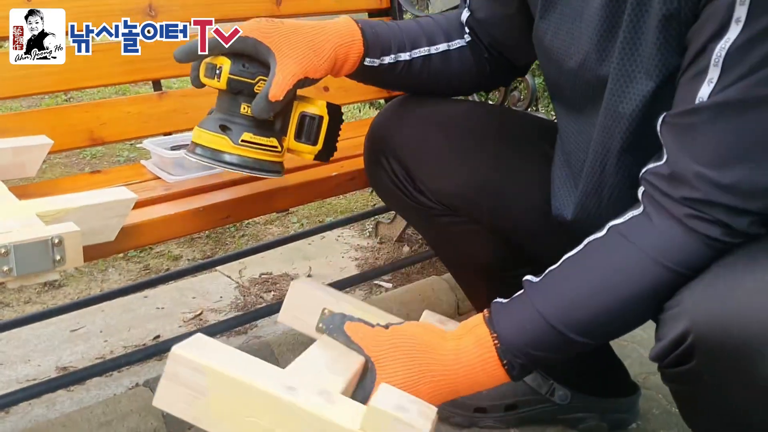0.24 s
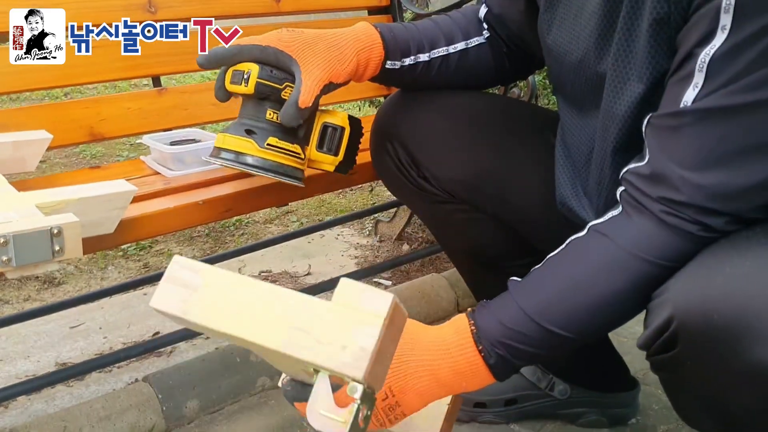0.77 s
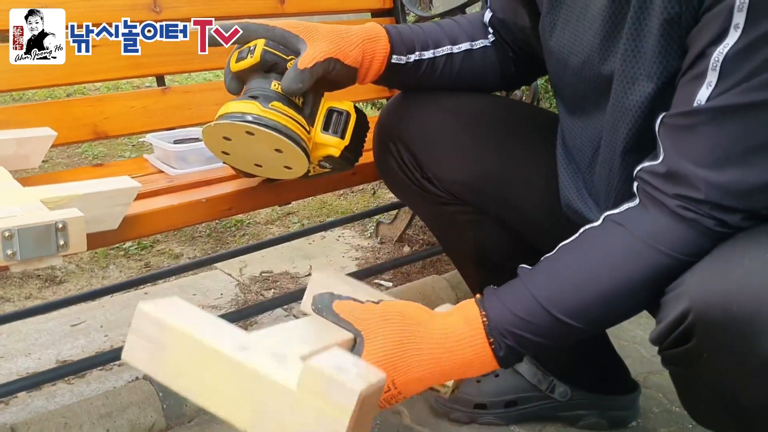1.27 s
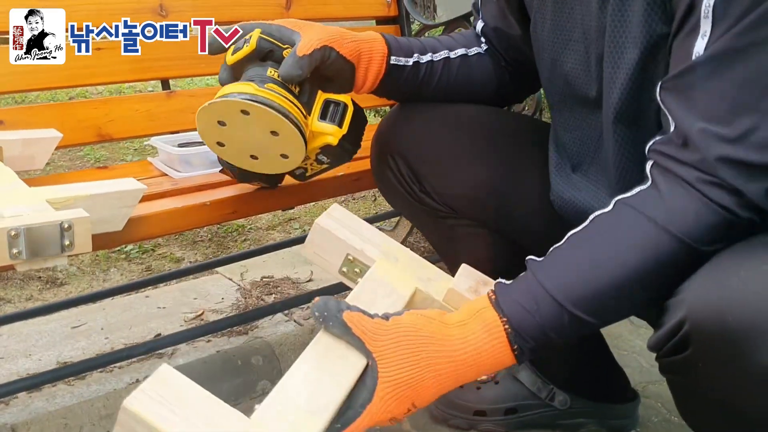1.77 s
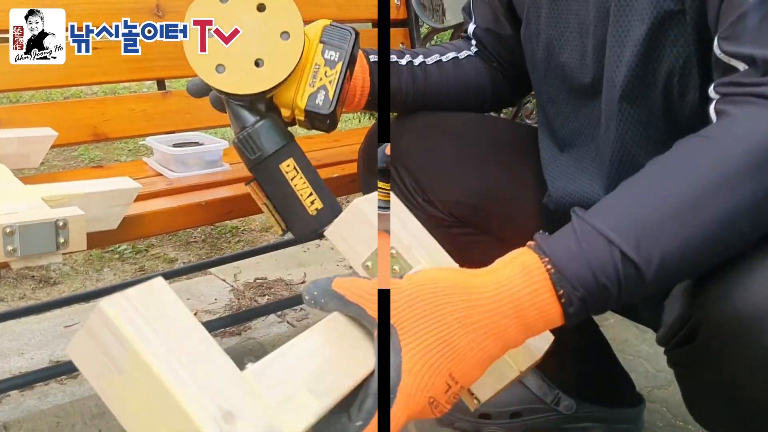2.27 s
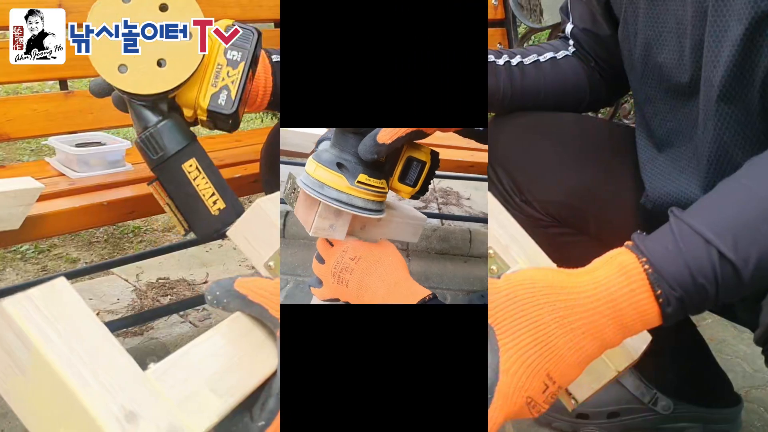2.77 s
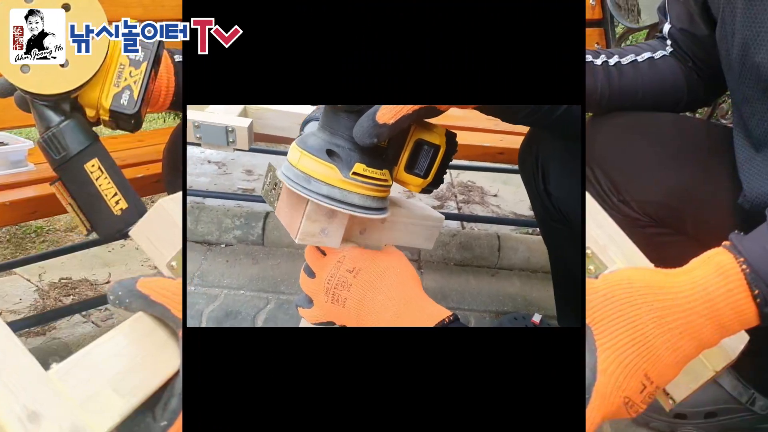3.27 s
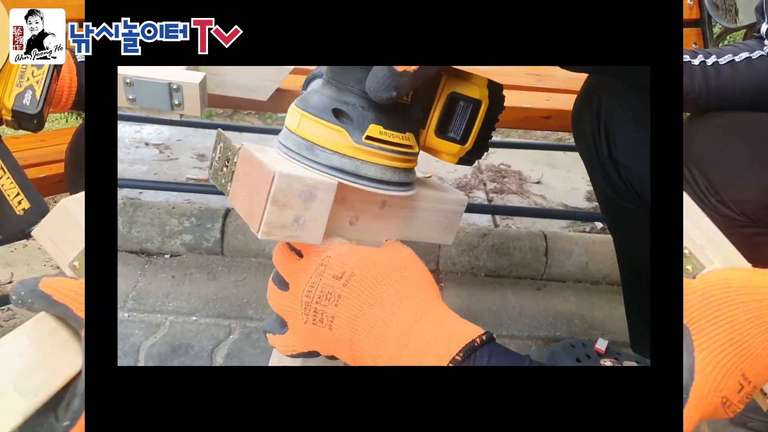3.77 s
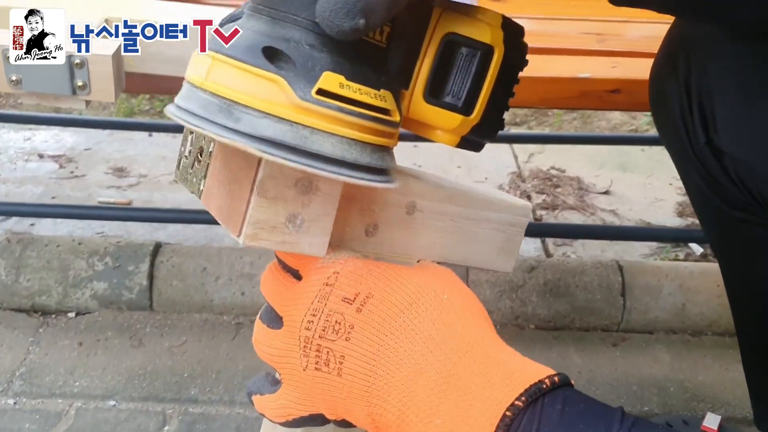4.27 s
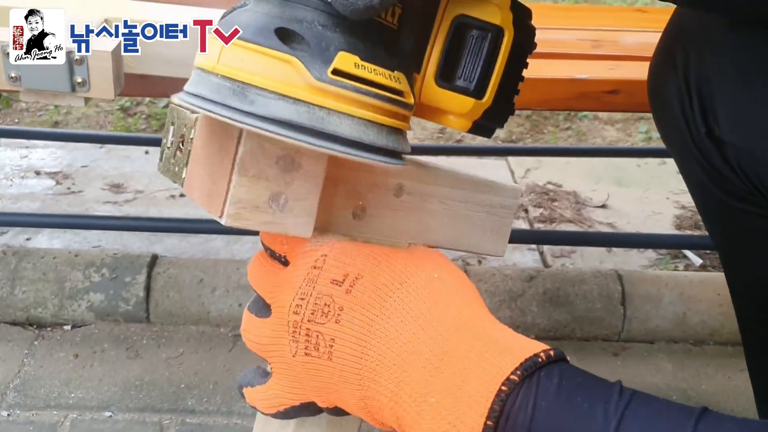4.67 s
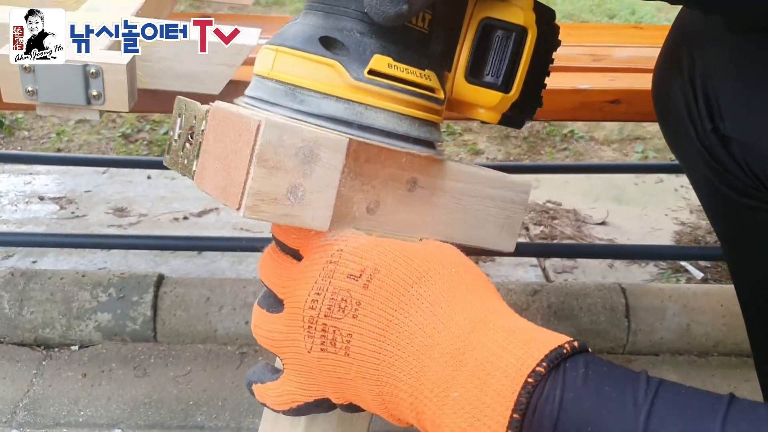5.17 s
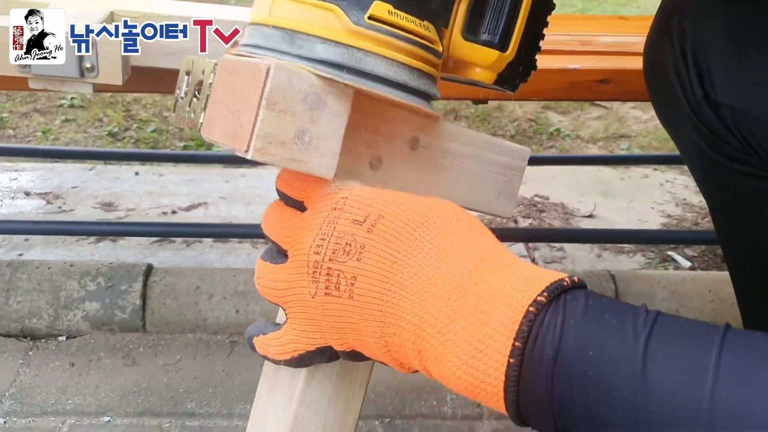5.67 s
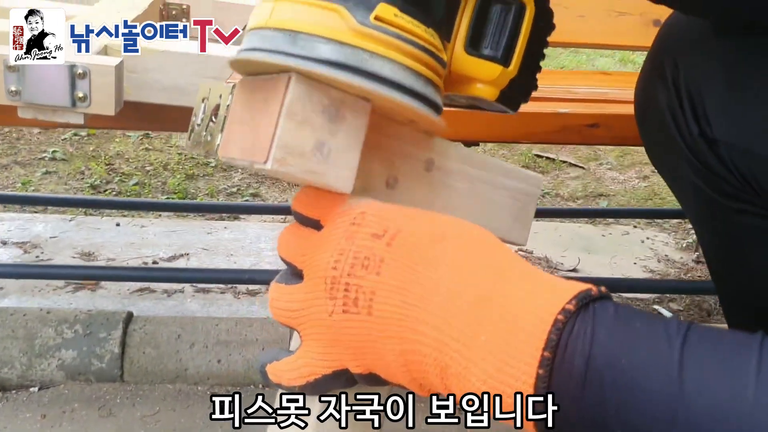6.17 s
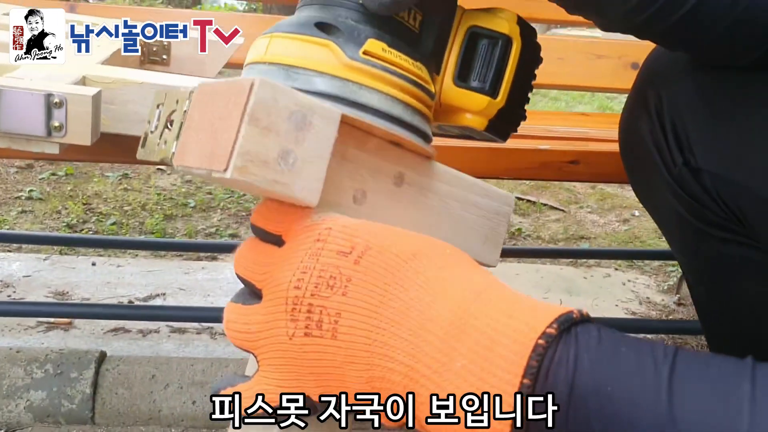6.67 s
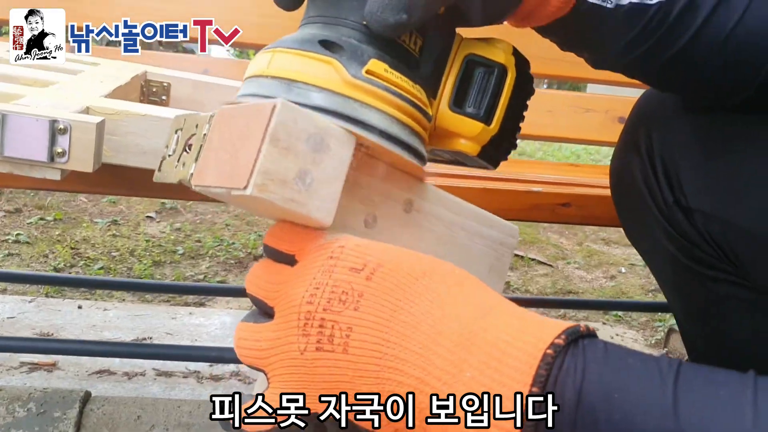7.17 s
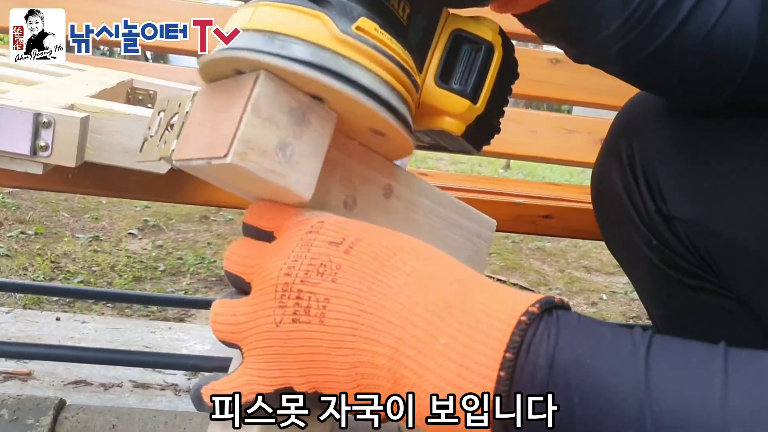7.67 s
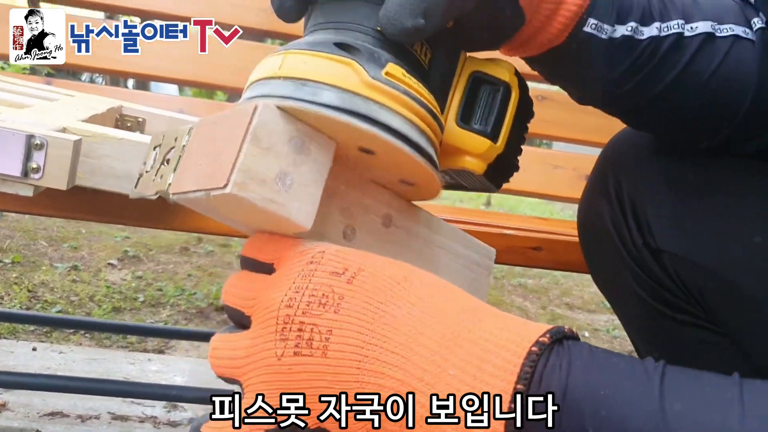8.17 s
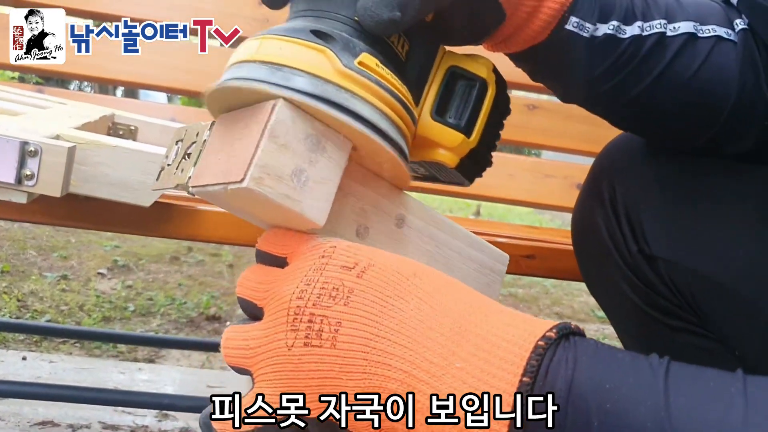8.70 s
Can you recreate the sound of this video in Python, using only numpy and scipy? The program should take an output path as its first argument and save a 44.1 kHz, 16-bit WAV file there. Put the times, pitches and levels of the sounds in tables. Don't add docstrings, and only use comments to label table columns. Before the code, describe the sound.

Quiet outdoor yard with traffic rumble, faint insect chirps and wood knocks, a brief dropout, then a loud orbital sander buzzing and rasping on wood.

```python
import sys
import numpy as np
from scipy import signal
from scipy.io import wavfile
from scipy.ndimage import uniform_filter1d

SR = 44100
rng = np.random.default_rng(int(sys.argv[2]) if len(sys.argv) > 2 else 0)


def volts_from_db(level):
    exponent = np.asarray(level, float) / 20
    return 10 ** exponent


def persist_wave(psi):
    counts = np.round(np.clip(psi, -1, 1) * 32767).astype(np.int16)
    wavfile.write(sys.argv[1], SR, np.atleast_2d(counts).T)


N = 394254
CUT_S, TICK_S, BACK_S = 2.1535, 2.27295, 2.353
LEAK_DB = -58
USUAL_FORCE, USUAL_SPEED = 0.6, 144

# time in seconds, level in dB.
CREEP = [(0, -68.5), (.4, -67), (.9, -62), (1.4, -58), (1.6, -57.2), (2.154, -57.2)]
# frequency in Hz, density in dB per Hz.
GRIT = [(2000, -12.5), (2700, -13), (3050, -11), (3500, -3), (4300, -2), (5000, -2), (5600, -6.5),
        (6000, -2.5), (7000, -1), (7700, -4.5), (9700, -9.5), (10500, -8.5), (12000, -14.5), (15700, -44)]


def evened(x):
    return x / np.sqrt(np.mean(abs(x) ** 2) + 1e-20)


def curves(rows):
    s, *columns = np.transpose(rows)
    return [np.interp(np.arange(N) / SR, s, c) for c in columns]


def bumps(s, length, size):
    t = np.arange(0, N + 50, 50) / SR
    total = np.exp(-2 * ((t[:, None] - s) / length) ** 2) @ size
    return np.interp(np.arange(N) / SR, t, total)


def band(x, lo_hz, hi_hz):
    sos = signal.butter(4, [lo_hz, hi_hz], "band", fs=SR, output="sos")
    return np.sqrt(np.mean(signal.sosfilt(sos, x) ** 2))


def noise(colour, patchy_db, bins, frames):
    hz = np.fft.rfftfreq(1024, 1 / SR)
    f, level_db = np.transpose(colour)
    a, b, patches = rng.standard_normal((N // 256 + 5, 513, 3)).T
    patches = uniform_filter1d(patches, size=bins, axis=0)
    patches = evened(uniform_filter1d(patches, size=frames, axis=1))
    shape_db = np.interp(np.log(hz + 1), np.log(f + 1), level_db, left=-90)[:, None]
    spectra = (a + 1j * b) * volts_from_db(shape_db + patchy_db * patches)
    return signal.istft(spectra, nperseg=1024, noverlap=768)[1][:N]


def wander(hz, count):
    shape = (N // 100 + 400, count)
    z = rng.standard_normal(shape) + 1j * rng.standard_normal(shape)
    sos = signal.butter(1, hz, fs=SR / 100, output="sos")
    z = evened(signal.sosfiltfilt(sos, z, axis=0)[200:-198])
    return [np.interp(np.arange(N) / 100, np.arange(len(z)), row) for row in z.T]


def shaft_orders(step, hz, force, damping_db, flutter_db, shakes):
    # multiple, level in dB, dB more per unit of force, dB more per orbit per s.
    order_levels = [(1, -8.5, -0.8, 0), (2, -6, -3.5, 0), (3, -3, 0, 0), (4, -6, 2.5, 0.3),
                    (5, -9, -4.5, -0.2), (6, -12.5, 10, 0.7), (7, -11, 3.9, .4), (8, -4.5, 5.5, 0.84),
                    (9, -1.5, -4, -0.5), (10, -10.5, 3.5, 0), (11, -9.5, 1, 0.1), (12, -7, -0.5, 1.1),
                    (13, -11.5, -0.5, -1.4), (14, -9.5, -2.3, 0), (15, -16, 2, -0.6), (16, -15, -3.5, -0.5),
                    (17, -20, 4, -2), (18, -18.5, 1, 1), (19, -18.5, -1, 1.5), (20, -15, 1, 0),
                    (21, -24.5, 0, 1), (22, -17.5, 3.5, 0.5)]
    chance_shares = {1: .1, 2: .38, 3: .27, 4: .48, 5: .8, 6: .75, 7: .75, 8: .45, 9: .36, 11: .58, 12: .55,
                     14: .62}
    # centre in seconds, length in seconds, level in dB.
    chokes = [
        (4.45, 0.15, -11),
        (5.58, 0.078, -5),
        (7.45, .06, -2),
        (8.78, 0.065, -3),
    ]
    choked_db = bumps(*np.transpose(chokes))
    fade_db = -0.7 * (np.arange(N) / SR - BACK_S)
    own_db = {2: damping_db, 4: choked_db, 9: choked_db + fade_db}
    tone, turn = np.zeros(N), 1
    phases = rng.random(len(order_levels))
    for (k, db, force_db, speed_db), shake, phase in zip(order_levels, shakes, phases):
        k, turn = round(k), turn * step
        share = chance_shares.get(k, np.clip(0.58 + 0.015 * (k - 4), 0, 1))
        if k % 2 == 0 and k >= 10:
            phase = 0
        if k == 3:
            level = 0.013 + 0.063 * force
        else:
            push_db = force_db * (force - USUAL_FORCE) + speed_db * (hz - USUAL_SPEED)
            level = volts_from_db(db - 24 + push_db + own_db.get(k, 0))
        if k == 1:
            level = level * volts_from_db(0.6 * flutter_db)
        waver = np.sqrt(1 - share ** 2) + share * shake
        tone += np.sqrt(2) * level * (waver * turn * np.exp(2j * np.pi * phase)).real
    return tone


def grain_repeats(step, hz):
    f, colour_db = np.transpose(GRIT)
    tone = np.zeros(N)
    turn = step ** 22 * volts_from_db(0.6 * (hz - USUAL_SPEED))
    for k, shake in enumerate(wander(10.0, count=26), 23):
        turn = turn * step
        level_db = -37.5 - 0.33 * (k - 22) + np.interp(k * hz.mean(), f, colour_db)
        tone += volts_from_db(level_db) * (abs(shake) * shake * turn).real
    return tone


def abrasion_and_fan(step, force, flutter_db, shake, drift):
    # frequency in Hz, density in dB per Hz.
    fan_colour = [(25, -30), (45, -49), (65, -28), (120, -8.5), (200, -14.5), (500, -2.5), (900, -6.5),
                  (1300, -1), (2000, 2), (2600, -3), (3200, -15.5)]
    grit = noise(GRIT, 1.57, bins=14, frames=12)
    fan = noise(fan_colour, 2.3, bins=6, frames=12)
    grit_db = -21 - 0.4 * (force - USUAL_FORCE) + flutter_db
    bite = 1 + ((0.099 + 0.15 * shake) * step + (0.058 + 0.11 * drift) * step ** 2).real
    rasp = volts_from_db(grit_db - 2.5) * grit / band(grit, 1800, 17000)
    return bite * (rasp + volts_from_db(-25) * evened(fan))


def sander():
    # centre in seconds, length in seconds, force, sag in orbits per s, second-order damping in dB.
    strokes = [(2.553, 0.21, 0.92, 0.45, -4.2), (2.92, 0.151, 0.93, 1.8, -5.4),
               (3.194, 0.104, 0.92, 1.93, -1.8), (3.471, 0.145, 0.94, 3.08, -4.9),
               (3.773, 0.15, 1.09, 2.76, -5.3), (4.245, 0.3, 1.2, 4.27, -3.0),
               (4.453, 0.148, 0.51, 2.73, -5.2), (4.825, 0.225, 1.13, 3.03, -8.2),
               (5.097, 0.154, 0.8, 2.03, -11.2), (5.424, 0.149, 0.5, 0.19, -2.1),
               (5.639, 0.155, 0.91, 1.35, -1.3), (5.924, 0.153, 0.97, 2.3, -3.5),
               (6.258, 0.167, 1.07, 2.64, -6.1), (6.558, 0.139, 1.05, 3.65, -2.7),
               (6.782, 0.091, 0.4, 0.41, -1.9), (7.074, 0.252, 0.94, 2.14, -2.4),
               (7.503, 0.155, 0.9, 2.33, -4.5), (7.863, 0.241, 0.67, 1.76, -6.6),
               (8.255, 0.212, 0.98, 0.99, -9.7), (8.461, 0.136, 0.86, 2.28, -6.1),
               (8.756, 0.23, 0.63, 2.4, -5.2)]
    # time in seconds, orbits per s.
    free_speed = [(2.35, 144.5), (3.9, 145.9), (4.35, 145.3), (4.7, 145.1), (5.1, 145.2), (5.4, 147.9),
                  (6.2, 145.8), (7.0, 146.9), (7.8, 144.8), (8.2, 144.1), (8.6, 142.5), (8.94, 142.0)]
    # centre in seconds, length in seconds, abrasion in dB.
    grabs = [(3.125, 0.083, -1.5), (3.38, 0.2, 0.7), (3.9, 0.064, 1.5), (4.035, 0.054, -1.5),
             (4.55, 0.15, 1), (4.84, .13, -2), (5.22, .06, -2.5), (5.682, 0.081, -3), (5.83, 0.076, 1.5),
             (6.66, .09, -1.5), (6.81, .07, 1.2), (7.142, .09, -3), (7.7, 0.16, 1.5), (8.808, 0.25, 2.3)]
    s, length, push, sag, damping = np.transpose(strokes)
    late_s = s + 0.05
    force = bumps(s, length, push)
    hz = curves(free_speed)[0] - bumps(late_s, length, sag)
    damping_db = bumps(late_s, length, damping)
    flutter_db = 1.3 * wander(10, count=1)[0].real + bumps(*np.transpose(grabs))
    drift, *shakes = wander(12, count=23)
    step = np.exp(2j * np.pi * np.cumsum(hz) / SR)
    tone = shaft_orders(step, hz, force, damping_db, flutter_db, shakes) + grain_repeats(step, hz)
    return tone + abrasion_and_fan(step, force, flutter_db, shakes[0], drift)


def knocks():
    # start in seconds, peak in dB, crack centre in Hz, low ring in Hz, low ring in dB.
    knock_list = [(.11, -49, 4200, 477, -8), (.183, -39, 5000, 360, -6), (.245, -42, 4300, 350, -8),
                  (.852, -40, 4800, 344, -6), (.945, -40, 5570, 1800, 6), (0.951, -42, 6940, 1420, 15.5),
                  (1.4626, -35, 4430, 345, -12), (1.4794, -33, 5260, 560, -10),
                  (1.505, -23.5, 7000, 330, -16), (1.616, -31, 7000, 302, -14),
                  (1.6822, -27.5, 4900, 1390, 0), (1.94, -27, 5300, 360, -7),
                  (2.0358, -36.5, 3000, 476, 19.5), (2.053, -22, 3000, 935, -2),
                  (2.0555, -24, 4500, 600, 3), (2.066, -25, 4500, 387, -2.5),
                  (2.0878, -18.5, 4600, 500, -21), (2.112, -25, 3000, 1320, 3), (2.116, -29, 2180, 905, -2)]
    out, t = np.zeros(N), np.arange(3000) / SR
    fade_db = -60 * t / 0.022
    cracks = rng.standard_normal((len(knock_list), len(t)))
    for (s, peak_db, hz, low_hz, low_db), crack in zip(knock_list, cracks):
        wide = signal.filtfilt(*signal.iirpeak(hz, 1.1, SR), crack)
        narrow = signal.lfilter(*signal.iirpeak(hz, 7, SR), crack)
        rough = signal.lfilter(*signal.iirpeak(2 * low_hz, 1, SR), crack)
        thud = 1.5 * np.sin(2 * np.pi * low_hz * t) + 0.28 * evened(rough)
        high = (0.55 * evened(wide) + 0.3 * evened(narrow)) * volts_from_db(fade_db)
        out[round(s * SR):][:len(t)] += volts_from_db(peak_db + fade_db) * (high + volts_from_db(low_db) * thud)
    return out


def insect():
    # start in seconds, length in seconds, level in dB.
    calls = [
        (1.05, .23, -55.5),
        (1.26, 0.12, -55),
        (1.38, .08, -57),
        (1.68, 0.092, -53),
        (1.8, .07, -53),
    ]
    t = np.arange(N) / SR
    hz = 5110 - 18 * (t - calls[0][0])
    level = np.zeros(N)
    for s, length, db in calls:
        level += volts_from_db(db) * np.clip(np.minimum(t - s, s + length - t) / 0.025, 0, 1)
    flutter = 1 + 0.4 * wander(40, count=1)[0]
    return level * np.sqrt(2) * (flutter * np.exp(2j * np.pi * np.cumsum(hz) / SR)).real


def traffic():
    # frequency in Hz, density in dB per Hz.
    rumble_colour = [(20, -33), (45, -23), (65, -4), (85, -8.5), (125, 9.5), (190, 0), (260, -9.5),
                     (350, -6.5), (500, -7.5), (900, -41.5)]
    wash_colour = [(180, -24), (300, 3.5), (420, -16), (530, -2), (700, -6.5), (1400, -7), (1800, -8.5),
                   (2100, -13), (3000, -16), (5300, -24.5), (8000, -31.5), (12000, -51)]
    # frequency in Hz, density in dB per Hz.
    hiss_colour = [(3000, -8), (5500, 0), (9000, -8.5), (15700, -19)]
    # centre in seconds, length in seconds, rise in dB.
    swells = [
        (1.2, 0.31, 3.5),
        (1.702, .17, 3),
        (2.1, 0.15, -3.5),
    ]
    rise_db = curves(CREEP)[0] - CREEP[0][1]
    scuff_db = bumps([2.045], [0.038], [6])
    rumble_db = -44.5 + 0.97 * rise_db + bumps(*np.transpose(swells)) + scuff_db
    wash_db = -50 + 1.31 * rise_db + scuff_db
    hiss_db = -64 + 18.5 * np.clip(np.arange(N) / SR - 0.89, 0, CUT_S)
    rumble = noise(rumble_colour, 1.5, bins=3, frames=6)
    wash = noise(wash_colour, 0.87, bins=12, frames=8)
    hiss = noise(hiss_colour, 1.1, bins=30, frames=4)
    far = volts_from_db(rumble_db) * rumble / band(rumble, 50, 360)
    near = volts_from_db(wash_db) * wash / band(wash, 600, 12000)
    return far + near + volts_from_db(hiss_db) * evened(hiss)


def idle_hiss(before):
    # frequency in Hz, density in dB per Hz.
    idle_colour = [(40, -6), (400, -9), (1500, -5), (3000, 0), (10000, -1), (16000, -3)]
    gain = np.where(before, volts_from_db(curves(CREEP)[0]), volts_from_db(-67))
    return gain * evened(noise(idle_colour, 0.63, bins=8, frames=4))


def tick():
    t = np.arange(N) / SR - TICK_S
    scrap = 0.12 * np.cos(2 * np.pi * 5300 * (t - 0.00002)) + 0.076 * np.sin(2 * np.pi * 2200 * t)
    return scrap * ((t > 0) & (t < 0.00036))


def scene():
    before = np.arange(N) / SR < (CUT_S + BACK_S) / 2
    live = 2 * np.where(before, traffic() + insect() + knocks(), sander())
    leak = volts_from_db(LEAK_DB) * signal.lfilter(*signal.butter(1, 4000, fs=SR), live)
    return np.array([idle_hiss(before) + leak, live])


def thinned(x, weak_db, starved, holes, top_hz):
    window = np.sqrt(signal.windows.hann(2048, sym=False))
    hz, t, z = signal.stft(x, SR, nperseg=2048, noverlap=1024, window=window)
    power = abs(z) ** 2
    weak = power < volts_from_db(2 * weak_db) * uniform_filter1d(power, size=24, axis=0)
    luck = np.repeat(rng.random((len(t) // 2 + 1, 172)), 2, axis=0)[:len(t)].T
    lost = np.repeat(luck < holes * (luck[1] < starved), 6, axis=0)[:len(hz)]
    loud_frame = power.sum(0) > 0.1 * np.median(power.sum(0))
    lost &= (hz < top_hz)[:, None] & loud_frame
    top_lost = (hz > 15150)[:, None] & (luck[0] < 0.45)
    gone = weak & (hz > 900)[:, None] | lost & (hz > 1500)[:, None] | top_lost
    return signal.istft(z * ~gone, SR, nperseg=2048, noverlap=1024, window=window)[1][:N]


def low_pass(x):
    return signal.sosfilt(signal.butter(12, 15500, fs=SR, output="sos"), x)


def record(dry):
    idle, live = dry / (1 + abs(dry / 1.44) ** 4) ** 0.38
    thin_idle = thinned(idle, -8, starved=1, holes=0.2, top_hz=15500)
    thin_live = thinned(live, -11, starved=0.2, holes=0.1, top_hz=8000)
    t = np.arange(N) / SR
    sounding = (t < CUT_S) | (t >= BACK_S)
    mix = np.array([thin_idle, thin_live]) * sounding + tick() * volts_from_db([[LEAK_DB], [0]]) * 2
    return low_pass(mix)


dry = scene()
out = record(dry)
persist_wave(out)
```